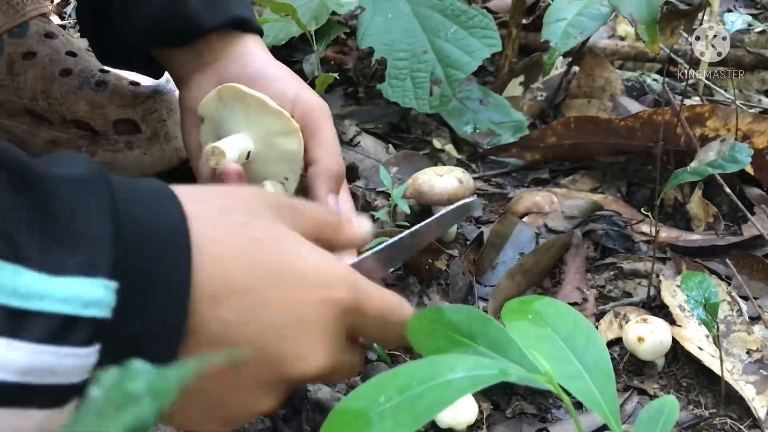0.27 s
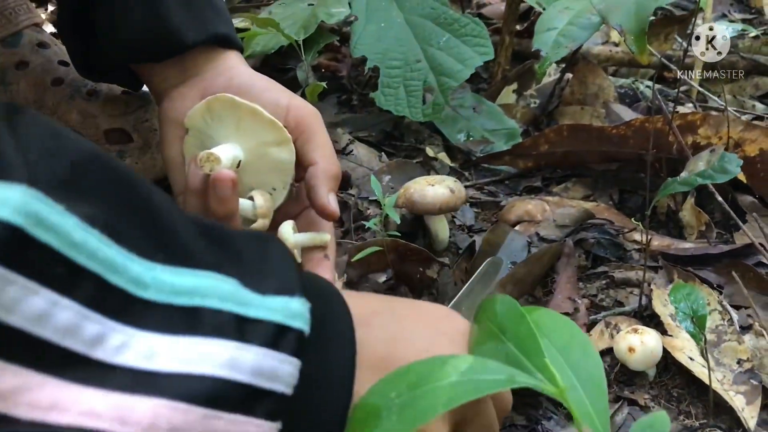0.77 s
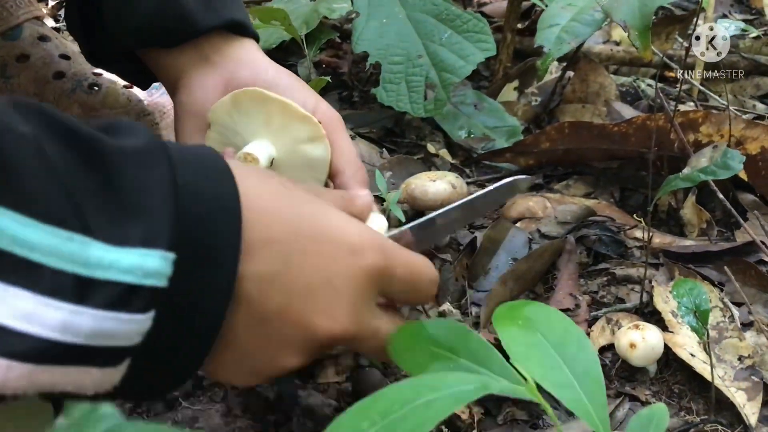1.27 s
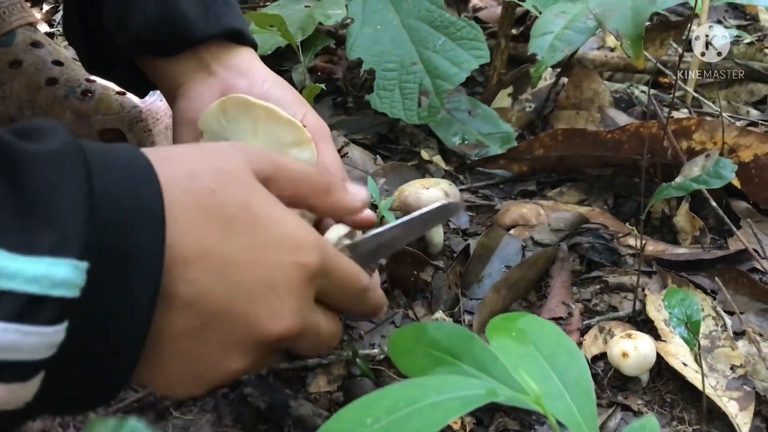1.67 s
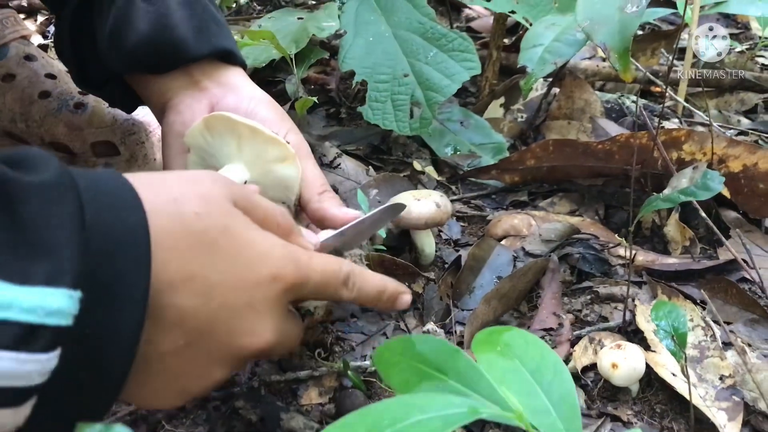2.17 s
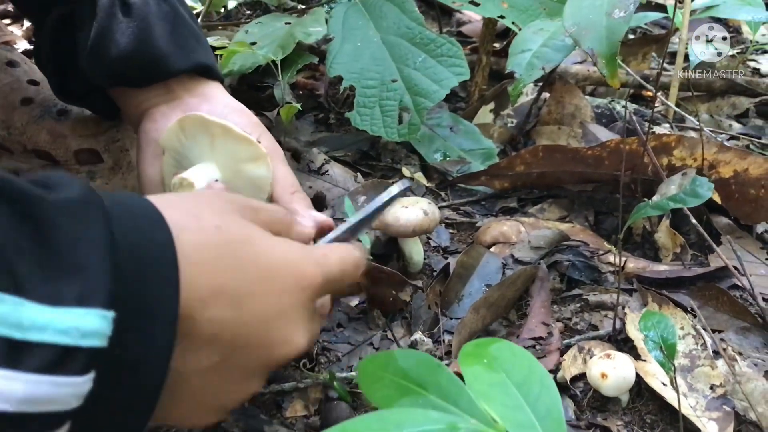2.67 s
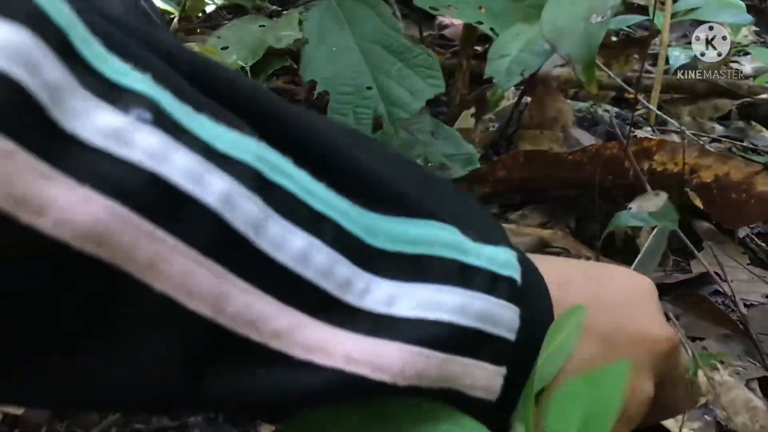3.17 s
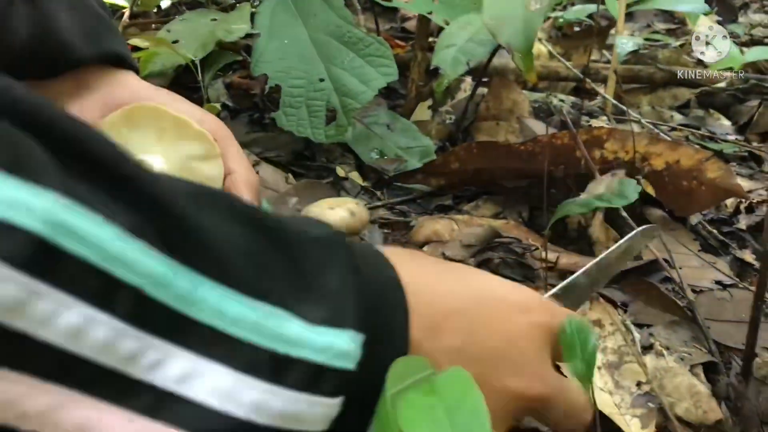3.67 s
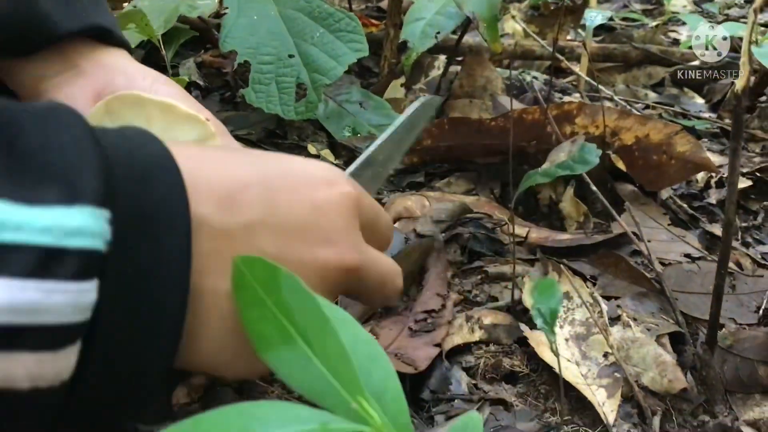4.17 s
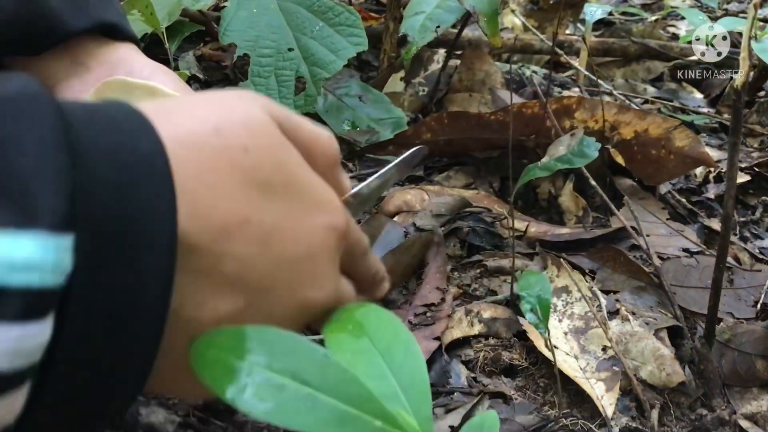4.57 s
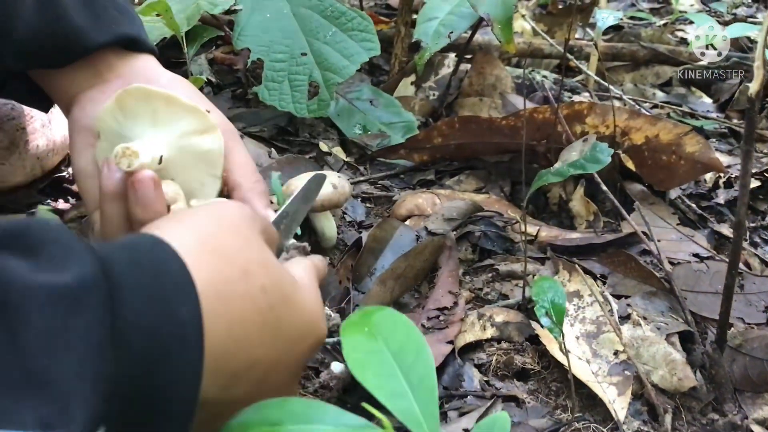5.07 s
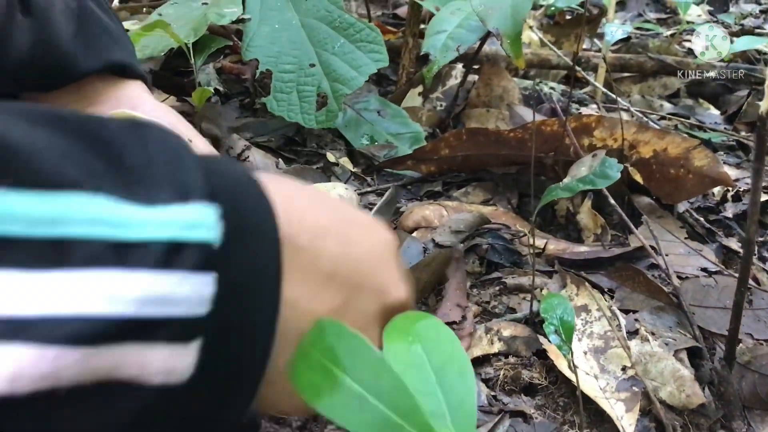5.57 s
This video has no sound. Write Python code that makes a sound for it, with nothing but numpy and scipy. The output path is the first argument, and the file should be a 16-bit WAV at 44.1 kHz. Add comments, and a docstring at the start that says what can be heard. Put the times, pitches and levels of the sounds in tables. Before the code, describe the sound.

Close handheld phone pickup of mushroom trimming on the forest floor. A bright, slightly fluttering insect buzz stays constant, diffused by the trees. Over it come a tiny metallic tick, dry crisp snaps and soft leaf scuffs, sparse at first, busiest around three seconds, quieter after four, then crackling again past five. Very faint bumps and a hush of air sit underneath.

```python
"""In a forest cicadas drone near 6 kHz, their click-excited buzz slowly speeding up, with crickets further off.
Close to the microphone a knife trims mushroom stems: a damped blade tick and snaps made of noise bursts.
Sleeve and hands rustle in dry leaves as clustered fractures; faint low thuds are damped sines.
Tree crickets trill as near-pure tones, raspy insects call near 11 kHz in the rhythm of the crickets,
and shaped noise gives a faint hush of air and far insect hiss."""
import sys
import numpy as np
from scipy import signal
from scipy.fft import rfft, irfft
from scipy.io import wavfile
from scipy.ndimage import uniform_filter1d

SR = 44100
rng = np.random.default_rng(int(sys.argv[2]) if len(sys.argv) > 2 else 0)


def wav_record(signal):
    """Record a signal, one row per channel, as 16-bit PCM in the file named by sys.argv[1]."""
    frames = np.transpose(np.atleast_2d(signal))
    bounded = np.clip(frames, -1, 1)
    # unit amplitude maps onto the largest positive 16-bit level
    quanta = np.round(bounded * 32767).astype(np.int16)
    wavfile.write(sys.argv[1], SR, quanta)


N = 256785
T = np.arange(N) / SR

# resonance of a cicada's abdomen: (frequency [Hz], relative level [dB])
ABDOMEN_RESONANCE = [(4500, -39), (5050, -23.5), (5350, -11.5), (5680, -1.5), (6000, 1.5), (6280, 3.5),
                     (6520, -5.5), (6800, -5.5), (7100, -14), (7400, -18), (7800, -24), (9800, -26),
                     (12000, -34.5)]
# strokes of hand and sleeve through the leaf litter, levels before the gains of the rustle:
# (middle [s], length [s], crunch level [dB], crisp edge level [dB])
LITTER_STROKES = [(0.219, 0.046, -71, -69.5), (0.461, 0.27, -67.5, -69.5), (0.589, 0.05, -69.5, -60),
                  (0.712, 0.074, -69.5, -61), (1.253, .16, -69, -74), (1.702, 0.085, -66.5, -73),
                  (2.488, .24, -71.5, -71.5), (2.765, 0.13, -70.5, -64), (2.928, 0.095, -70.5, -64),
                  (3.051, 0.088, -64.5, -64.5), (3.18, 0.093, -58.5, -62.5), (3.248, 0.055, -64, -64.5),
                  (3.652, 0.4, -71, -71.5), (4.014, 0.21, -68.5, -67), (4.15, 0.077, -67, -61.5),
                  (4.448, 0.62, -75, -74), (5.351, .07, -72, -73), (5.558, 0.079, -69, -62),
                  (5.68, 0.19, -67, -64.5)]


def undb(db):
    """Amplitude ratio from decibels: 20 dB is a factor of ten."""
    return 10 ** (np.asarray(db) / 20)


def unit(x):
    """Normalisation to an rms of 1."""
    return x / np.sqrt(np.mean(x ** 2))


def curve(rows):
    """Linear interpolation in time of (time [s], value) rows."""
    times, values = np.transpose(rows)
    return np.interp(T, times, values)


def colour(x, points):
    """Linear filtering by (frequency [Hz], level [dB]) points on a log frequency axis, to an rms of 1."""
    hz, db = np.transpose(points)
    f = np.maximum(np.arange(N // 2 + 1) * SR / N, 1)
    gain = undb(np.interp(np.log(f), np.log(np.sort(hz)), db))
    return unit(irfft(rfft(x) * gain, N))


def noise():
    """White noise: equal mean power at every frequency."""
    return rng.standard_normal(N)


def walk(rate):
    """Band-limited random modulation: about `rate` turns a second, with an rms of 1."""
    k = max(int(SR / rate), 2)
    steps = np.repeat(rng.standard_normal(N // k + 1), k)
    smooth = uniform_filter1d(uniform_filter1d(steps, k), k)
    return unit(smooth[:N])


def forest(x, t60, direct):
    """Multiple scattering: trunks and leaves add an exponentially decaying diffuse tail to the direct path."""
    tail = noise() * np.exp(-np.log(1000) * T / t60)
    tail /= np.sqrt(np.sum(tail ** 2))
    tail[0] += direct
    lead = np.concatenate([x[:SR][::-1], x])  # the woods are already ringing at the start
    return unit(signal.fftconvolve(lead, tail[:SR])[SR:SR + N])


def cicada(rate_hz, flutter, flutter_hz, jitter, rough):
    """Impulsive excitation of a resonator: tymbals buckle at a fluttering pace, each click ringing the abdomen."""
    sway = np.sin(2 * np.pi * np.cumsum(flutter_hz * (1 + .25 * walk(12))) / SR)
    phase = np.cumsum(rate_hz * (1 + flutter * sway + jitter * walk(170))) / SR
    at = np.interp(np.arange(1, int(phase[-1])), phase, np.arange(N))
    size = 1 + rough * rng.standard_normal(len(at))
    # windowed sinc pulses place each click between samples
    taps = at.astype(int)[:, None] + np.arange(-7, 9)
    offset = taps - at[:, None]
    pulse = np.sinc(offset) * np.cos(np.pi * offset / 16) ** 2
    weights = (size[:, None] * pulse).ravel()
    clicks = np.bincount(np.clip(taps, 0, N - 1).ravel(), weights, N)
    return colour(clicks, ABDOMEN_RESONANCE)


def cicadas():
    """Superposed pulse trains: a near cicada coarser as it quickens, one about twice as fast, a distant blur."""
    # pace of the leading cicada: (time [s], tymbal click rate [Hz])
    click_rate = [(0, 294.2), (.45, 294.6), (.9, 297.5), (1.5, 298.2), (2.2, 298.3), (2.9, 299.6),
                  (3.15, 301), (3.4, 304), (4, 304.2), (4.6, 305), (5.2, 305.2), (5.8, 303.6)]
    # loudness of the leading cicada: (time [s], level [dB])
    near_level = [(0, -48), (.8, -49.5), (2.2, -48.5), (3.2, -49), (4.2, -49), (5, -50.5), (5.8, -50)]
    # loudness of the second cicada, which joins in more strongly: (time [s], level [dB])
    second_level = [(0, -62.5), (3, -60), (3.6, -75), (4.6, -53), (5.8, -52.5)]
    rate_hz = curve(click_rate)
    flutter = np.interp(rate_hz, [294, 299, 305], [.0045, .006, .0095])
    near = cicada(rate_hz, flutter, flutter_hz=13, jitter=.0036, rough=.09)
    second = cicada(np.full(N, 610.), flutter=.007, flutter_hz=19, jitter=.003, rough=.1)
    near = forest(near, t60=0.51, direct=0.16) * undb(curve(near_level))
    second = forest(second, t60=1.0, direct=0.18) * undb(curve(second_level))
    crowd = colour(noise(), ABDOMEN_RESONANCE) * undb(-70.5)
    return (near + second + crowd) * undb(.5 * walk(22.11))


def rustle(crunch_db=2.0, edge_db=2.5):
    """Granular friction: pressed litter gives a smooth dull scuff, a grainy crunch and a crisp edge, in clumps."""
    clumps = undb(2.5 * walk(70))  # depth [dB], pace [turns per s]
    scuff = colour(crackle(rate=4000, spread_db=1.5),
                   [(30, -3), (90, 8.0), (300, 5.5), (700, 3.5), (1800, -3.0), (3000, -6.5), (8000, -12)])
    crunch = colour(crackle(rate=2200, spread_db=4.0),
                    [(800, -27), (2400, -0.5), (3800, -1.5), (6000, -1.0), (10000, -23.5)])
    edge = colour(crackle(rate=2600, spread_db=4.0), [(3000, -8), (7500, 3.5), (11000, 2.5), (15500, -3.5)])
    press, crisp = pressure()
    body = press * undb(crunch_db) * (undb(-0.5) * scuff + crunch)
    return clumps * (body + crisp * undb(edge_db) * edge)


def crackle(rate, spread_db):
    """Shot noise: many tiny fractures, a few much larger, each smeared for a millisecond or two."""
    size = undb(spread_db * np.minimum(rng.exponential(size=N), 4))
    energy = (rng.random(N) < rate / SR) * size ** 2
    smeared = signal.lfilter([1], [1, -np.exp(-1 / (.0006 * SR))], energy)
    return np.sqrt(smeared + 1e-18) * noise()


def pressure():
    """Addition of power: strokes swell and die away alike over a faint stirring; crunch and edge gains."""
    rest_crunch_db, rest_edge_db = -78, -78  # between strokes the hands barely stir the leaves
    power = undb(2 * np.array([[rest_crunch_db], [rest_edge_db]]))
    for middle, length, crunch_db, edge_db in LITTER_STROKES:
        swell = np.exp(-(2 * (T - middle) / length) ** 2)
        power = power + undb(2 * np.array([[crunch_db], [edge_db]])) * swell
    return np.sqrt(power)


def snaps(decay_s=0.0035, tail_s=0.017, tail_db=-18):
    """Brittle fracture: each break builds to a burst that rings the leaf, with a little scatter from the ground."""
    # louder snaps of stems and dry leaves, levels before the band gains:
    # (time [s], hollow body level [dB], crack level [dB], crisp edge level [dB])
    loud_snaps = [(.5347, -59.5, -56, -65), (.6935, -53.5, -56, -63), (.7203, -56, -70, -58),
                  (1.2274, -54.5, -71, -60), (1.2978, -72, -53, -57), (1.384, -45, -60, -59),
                  (1.3976, -59, -54, -64), (2.399, -54.5, -47.5, -40), (2.4649, -51, -55, -69),
                  (2.58, -59, -57, -54), (2.7164, -76, -71, -54), (3.161, -50, -62, -55),
                  (3.1702, -46, -44.5, -57), (3.1792, -53, -57, -63), (3.2167, -57, -59, -62),
                  (3.3967, -53, -80, -57), (3.5874, -81, -62.5, -51), (3.698, -64, -62, -50.5),
                  (4.0207, -57, -55, -61), (5.3233, -75, -55, -48.5), (5.3424, -74, -65, -47),
                  (5.3515, -75, -46, -54), (5.401, -55.5, -55, -45.5), (5.5353, -67, -61, -51),
                  (5.656, -58, -55, -66), (5.783, -52.5, -75, -66)]
    # (gain [dB], spectrum) of the body, the crack and the crisp edge
    bands = [(1.56, leaf_body()),
             (2.03, [(1800, -16), (2800, 1), (3400, 4), (4500, -2.5), (7000, 0), (10000, -18)]),
             (2.2, [(4500, -32), (7500, 0.5), (11000, 1.5), (15500, 4)])]
    build_s = 0.0016  # time constant of the gathering before the burst
    age = np.arange(-SR // 20, SR // 20) / SR - .0012
    after = np.maximum(age, 0)
    build = np.exp(np.minimum(age, 0) / build_s)
    shape = build * (np.exp(-after / decay_s) + undb(tail_db) * np.exp(-after / tail_s))
    rows = np.vstack([loud_snaps, twigs()])
    out = 0
    for levels, (gain_db, spectrum) in zip(rows.T[1:], bands):
        blows = np.bincount((rows[:, 0] * SR).astype(int), undb(levels + gain_db), N)
        envelope = signal.fftconvolve(blows, shape, "same")
        out = out + envelope * colour(noise(), spectrum)
    return out


def leaf_body():
    """Modal superposition: the powers of a leaf's resonances summed into (frequency [Hz], level [dB]) points."""
    # resonances of a stiff dry leaf: (frequency [Hz], width [Hz], relative level [dB])
    leaf_modes = [(840, 410, 4), (1040, 190, -5), (1420, 240, 0), (2070, 350, -8), (2790, 350, 1)]
    hz = np.geomspace(100, 8000, 120)
    power = 0
    for f, width, db in leaf_modes:
        detuning = (hz / f - f / hz) * f / width
        power = power + undb(2 * db) / (1 + detuning ** 2)
    return np.column_stack([hz, 10 * np.log10(power)])


def twigs(count=2):
    """Random failure under load: each stroke snaps `count` twigs, louder as it presses; rows as for the snaps."""
    over_db, spread_db = 1, 4  # height over the rustle's table level, approximate spread
    middle, length, crunch_db, edge_db = np.repeat(LITTER_STROKES, count, axis=0).T
    chance = rng.uniform(-0.92, 1, (len(middle), 4)).T
    levels = np.array([crunch_db, crunch_db, edge_db]) + over_db + spread_db * np.sqrt(3) * chance[1:]
    at = np.clip(middle + chance[0] * length / 2, 0, T[-1])
    return np.column_stack([at, *levels])


def blade_tick(edge_db=-30, lead_s=.0006, edge_s=.0003):
    """Damped vibration: a sharp contact, then a few cycles of the blade, stopped at once by the fingers."""
    # the blade slips through a stem: (time [s], ring frequency [Hz], peak level [dB], half length [s])
    blade_ring = (.0407, 3950, -25.5, .0005)
    at, hz, db, half = blade_ring
    ring = undb(db) * np.exp(-((T - at) / half) ** 2) * np.sin(2 * np.pi * hz * (T - at))
    scrape = colour(noise(), [(500, -1), (7000, 8), (15000, -2)])
    contact = np.exp(-np.abs(T - at + lead_s) / edge_s) * scrape
    return ring + undb(edge_db) * contact


def low_thuds(decay_s=0.011):
    """Heavily damped oscillation: faint low thuds, each a sine that dies away exponentially."""
    # faint low thuds: (time [s], frequency [Hz], initial level [dB])
    thud_rows = [(0.061, 60, -48), (.165, 60, -51), (1.108, 69, -46.5), (3.054, 81.4, -46),
                 (3.165, 338, -46), (3.174, 208, -45.5), (3.192, 82, -46.5), (3.251, 141, -46.5),
                 (5.534, 89.5, -55), (5.628, 65, -48.5)]
    out = 0
    for at, hz, db in thud_rows:
        age = np.maximum(T - at, 0)
        out = out + undb(db) * np.exp(-age / decay_s) * np.sin(2 * np.pi * hz * age)
    return out


def tree_crickets():
    """Near-sinusoidal wing vibration: thin trills that swell and fade, with slight frequency modulation."""
    # trills: (middle [s], length [s], frequency [Hz], level [dB])
    wing_trills = [(1.1, 2.2, 5606, -64), (1.1, 1.2, 6402, -62), (3.8, 1.9, 5605, -60),
                   (4.3, .6, 6255, -61), (4.75, 1.2, 5926, -61), (4.8, 1.5, 5272, -70)]
    out = 0
    for middle, length, hz, db in wing_trills:
        swell = np.cos(np.pi * np.clip((T - middle) / length, -.5, .5))
        tone = unit(np.sin(2 * np.pi * np.cumsum(hz + 6 * walk(60)) / SR))
        out = out + undb(db) * swell * tone
    return out


def crickets_and_raspy_insects(uneven_db=2.5):
    """Amplitude and phase modulation: low cricket tones and raspy insect calls near 11 kHz share a rhythm."""
    # calls repeated over and over, levels before the swell of the call:
    # (cricket frequency [Hz], middle of first call [s], period [s], cricket level [dB], raspy high level [dB])
    callers = [(2654, .2, .632, -76, -70), (2722, .4, .83, -81, -71.5), (2700, .2, .63, -85, -75),
               (2800, .45, .85, -81, -78), (2880, .35, .86, -90, -76)]
    sag = 0.00299  # fall of pitch through each call, as a share of the pitch
    out = 0
    for hz, first, period, low_db, high_db in callers:
        turn = 2 * np.pi * (T - first) / period
        call = (.55 + .45 * np.cos(turn)) ** .8 * undb(uneven_db * walk(4))
        pitch_hz = hz * (1 - sag * np.sin(turn) + .0022 * walk(70))
        phase = 2 * np.pi * np.cumsum(pitch_hz) / SR
        rasp = np.sin(4 * phase + 1.3 * walk(330))  # set at four times the cricket's frequency
        low = forest(np.sin(phase + 0.99 * walk(110)), t60=0.2, direct=1.0)
        high = forest(rasp, t60=0.23, direct=0.73)
        out = out + call * (undb(low_db) * low + undb(high_db) * high)
    return out


def background():
    """Spectrally shaped noise: a low hush of air and the smooth hiss of the farthest insects."""
    # still air under the trees: (frequency [Hz], relative level per Hz [dB])
    air_spectrum = [(25, -6.5), (55, 0.5), (120, -4.5), (300, -11), (480, -16.5), (720, -16), (1100, -17.5),
                    (2000, -22.5), (3300, -24), (4800, -24), (6500, -60)]
    # far insect hiss: (frequency [Hz], relative level per Hz [dB])
    hiss_spectrum = [(2500, -54), (3000, -14), (3150, -2), (3350, -3), (4800, -20), (6000, 20), (8000, 0),
                     (10000, -1.5), (12500, 4), (15500, -22)]
    air = colour(noise(), air_spectrum) * undb(-63.5 + .5 * walk(4.76))
    far_insects = colour(noise(), hiss_spectrum) * undb(-64 + 0.47 * walk(2.2))
    return air + far_insects


def scene():
    """Linear superposition: insects all around, the knife work close by, low thuds and a hush beneath."""
    insects = cicadas() + tree_crickets() + crickets_and_raspy_insects()
    knife_work = rustle() + snaps() + blade_tick()
    return (insects + knife_work + low_thuds() + background())[None]


def record(dry):
    """Band limiting: the phone thins the deepest bass and cuts the top."""
    thin = signal.sosfilt(signal.butter(4, 37, "high", fs=SR, output="sos"), dry)
    top_hz = 15700
    return signal.sosfilt(signal.ellip(10, .2, 70, top_hz, fs=SR, output="sos"), thin)


dry = scene()
out = record(dry)
wav_record(out)
```